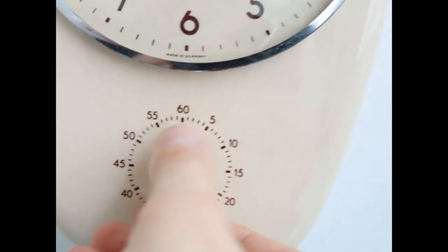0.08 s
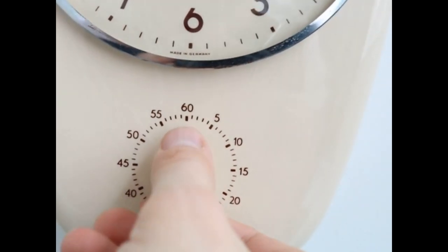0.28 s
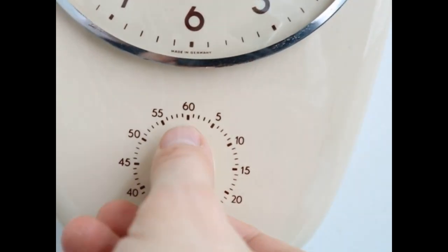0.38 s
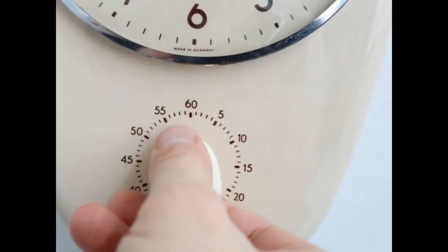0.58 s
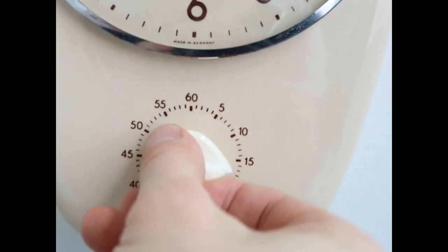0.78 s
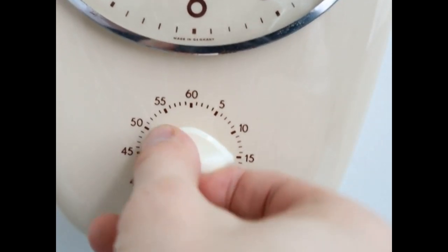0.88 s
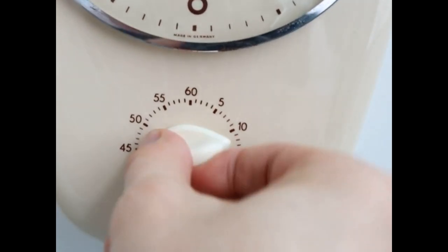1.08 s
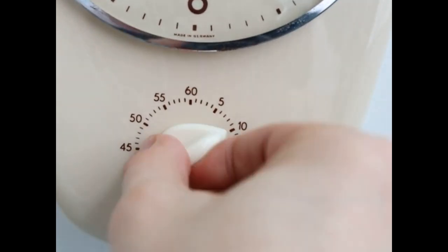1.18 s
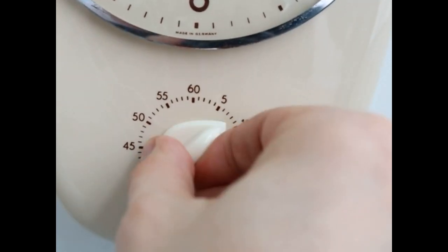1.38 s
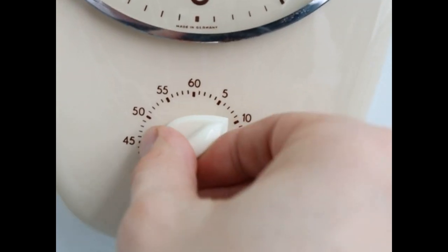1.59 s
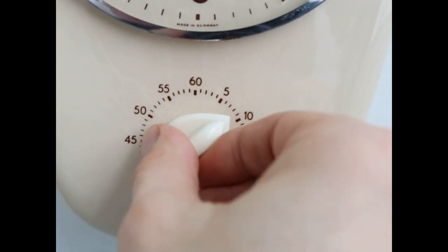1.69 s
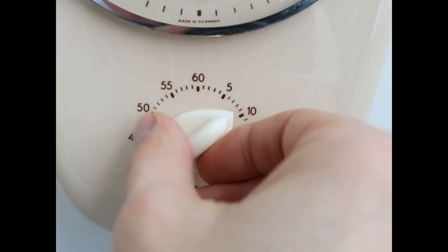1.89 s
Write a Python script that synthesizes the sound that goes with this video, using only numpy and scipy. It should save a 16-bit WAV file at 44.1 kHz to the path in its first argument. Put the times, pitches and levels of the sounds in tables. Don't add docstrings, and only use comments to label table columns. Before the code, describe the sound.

Ratcheting clicks of a hand-wound mechanical timer, with hollow finger knocks and faint clock ticking, close up

```python
import sys
import numpy as np
from scipy import signal
from scipy.fft import rfft, irfft
from scipy.io import wavfile
from scipy.ndimage import uniform_filter1d

SR = 44100
rng = np.random.default_rng(int(sys.argv[2]) if len(sys.argv) > 2 else 0)


def waveform_to_disk(signal):
    frames = np.transpose(np.atleast_2d(signal))
    scaled = np.clip(frames, -1, 1) * 32767
    samples = np.round(scaled).astype(np.int16)
    wavfile.write(sys.argv[1], SR, samples)


def field_ratio(decibels):
    return 10 ** (np.asarray(decibels, dtype=float) / 20)


N = 83790
T = np.arange(N) / SR

# [dB, hollow thump against click]
TEETH = [(0.5022, -14.5, -24), (0.5279, -17, -26), (0.5325, -17.5, -9.5), (0.6161, -16, -32),
         (0.6355, -18.5, -24), (0.642, -13.5, -27.5), (0.6657, -12, -19.5), (0.7084, -15, -22),
         (0.7384, -14, -33), (0.7574, -14, -19.5), (0.801, -13.5, -23.5), (0.8358, -19.5, -22.5),
         (0.8515, -11.5, -30), (0.8728, -13.5, -22.5), (0.8936, -12.5, -21), (0.9455, -25, -30),
         (0.9617, -13.5, -23), (0.9869, -13.5, -22.5), (1.0134, -17, -40), (1.0436, -15.5, -22.5),
         (1.0685, -15, -23), (1.0938, -15, -21), (1.1226, -15, -30), (1.1476, -13.5, -21.5),
         (1.177, -16, -43), (1.2037, -11.5, -25), (1.2282, -12.5, -22), (1.2571, -12.5, -21)]
# start_s [s], peak_db [dB]
CLOCK_TICKS = [
    (0.1131, -31),
    (0.3455, -34.5),
    (0.353, -30),
    (0.6109, -22.5),
    (.862, -20),
    (1.111, -23),
    (1.348, -25),
    (1.356, -26.5),
    (1.6155, -33.5),
    (1.8568, -33),
]
# start_s [s], peak_db [dB], contact_ms [ms]
KNOCKS = [
    (.2377, -2, 0.52),
    (.274, -17, 0.59),
    (.3495, -21, 0.73),
    (.363, -22, 1.8),
    (.386, -21.5, 1.56),
    (.394, -26.5, 0.68),
    (.5368, -12, 0.79),
    (.543, -10, 0.58),
    (.651, -17, 1.13),
]
# start_s [s], peak_db [dB], pitch_hz [Hz], second_pitch_hz [Hz]
CREAKS = [
    (.058, -34.5, 967, 1065),
    (.167, -43, 2200, 5030),
    (.2, -42, 5530, 3620),
    (.401, -48, 2200, 2460),
    (.6, -35.5, 2600, 3300),
    (1.54, -42, 2180, 1390),
    (1.777, -41, 1350, 2410),
    (1.806, -37.5, 5450, 3570),
]
# pitch_hz [Hz], level_db [dB], t60_s [s to fade by 60 dB]
PLATE = [(423, 0, 0.038), (1022, -8, 0.023), (1966, -9, 0.062), (2514, -10, 0.1), (2866, -7, 0.053),
         (3480, -9.5, 0.047), (4217, -12, 0.029), (4580, -4.5, 0.013), (5220, -15.5, 0.057),
         (5990, -13, 0.043), (6390, -16.5, 0.09), (5440, -2.5, 0.0033)]
# pitch_hz [Hz], level_db [dB], t60_s [s]
CASE = [(315.5, -13.5, 0.32), (378, -7, 0.074), (434, 5, 0.067), (572, 0, 0.034), (680, -9.5, 0.21),
        (753, -5, 0.041), (899, -3.5, 0.071), (1004, -5, 0.042), (1072, 0.5, 0.028), (1285, -15.5, 0.086)]
CASE_CUT_HZ = 245
TOOTH_DELAY_S = 0.0006


def on_hz(hz, table):
    table_hz, value = np.array(table).T
    return np.interp(np.log(np.maximum(hz, 1)), np.log(np.maximum(table_hz, 1)), value)


def unit(x):
    return x / np.sqrt(np.mean(x ** 2))


def add(out, start_s, x):
    i = int(start_s * SR)
    out[..., i:i + x.shape[-1]] += x[..., :N - i]


def smear(x, response):
    return signal.fftconvolve(np.atleast_2d(x), np.atleast_2d(response), axes=1)[:, :N]


def above(hz, x):
    return signal.lfilter(*signal.butter(2, hz, "high", fs=SR), x)


def walk(rate_hz):
    hold = int(SR / rate_hz)
    steps = np.repeat(rng.standard_normal(N // hold + 1), hold)
    return unit(uniform_filter1d(uniform_filter1d(steps, hold), hold)[:N])


def band(hz, width_octaves, side):
    f = np.arange(N // 2 + 1) * SR / N + 1
    bell = np.exp(-(np.log2(f / hz) / width_octaves) ** 2)
    mid, differ = irfft(rfft(rng.standard_normal((2, N))) * bell, N)
    return unit(np.array([mid + side * differ, mid - side * differ]))


def tilt(hz):
    port_tilt = [(60, -1), (110, 2.5), (200, -2), (380, 3), (700, -1.5), (1290, 2), (2380, -4.5),
                 (4400, -3), (8120, -6), (15000, 4.5)]
    return field_ratio(np.multiply.outer([0.5, -0.5], on_hz(hz, port_tilt)))


def ring(modes, scatter_db, swell_s=0.0001):
    left_lead = [(0, 0), (2070, -0.7), (2670, 1.3), (3010, -0.2), (4390, 0.2), (5250, -0.7), (6550, -2.0),
                 (7670, 5.0), (8790, 3.7), (9820, 5.4), (10100, 7.0), (10800, 8.5), (12000, 12.8),
                 (16400, 12.6)]
    detune = 0.004
    twins = [(f * 1.017, d - 2, t60) for f, d, t60 in modes if f > 1500]
    hz, db, t60 = np.array(modes + twins).T[:, :, None]
    pitch_chance, level_chance = rng.standard_normal((2, len(hz), 1))
    t = T[:int(SR * t60.max())]
    lead = np.multiply.outer([1, 0], np.interp(hz, *np.array(left_lead).T) * (hz > 900))
    waves = np.sin(2 * np.pi * hz * (1 + detune * pitch_chance) * t + lead)
    tones = waves * tilt(hz) * field_ratio(db + scatter_db * level_chance - 60 * t / t60)
    return tones.sum(axis=1) * (1 - np.exp(-t / swell_s))


def ratchet():
    # pitch_hz [Hz], level_db [dB], t60_s [s]
    plate_top = [(9900, -22, .055), (14000, -15, .007)]
    tooth_db, thump_boost_db, scatter_db = -12.5, 17.5, 3.5
    bounce_s, bounce_db = 0.0022, -3.5
    out = np.zeros((2, N))
    for start_s, db, thump_db in TEETH:
        modes = [(f, d + (thump_db + thump_boost_db) * (f < 600), t60) for f, d, t60 in PLATE + plate_top]
        drop_s = start_s + TOOTH_DELAY_S
        add(out, drop_s, field_ratio(db + tooth_db) * ring(modes, scatter_db))
        add(out, drop_s + bounce_s, field_ratio(db + tooth_db + bounce_db) * ring(modes, scatter_db))
    return out


def fade(x, t60_s):
    return signal.lfilter([1], [1, -field_ratio(-60 / t60_s / SR)], x)


def rattle(sharp, soft):
    rattle_level = [(410, -31), (700, -8.5), (1480, -16), (1940, -7), (4050, -5), (4730, -0.5),
                    (6570, -3.5), (10100, -13.5), (16000, -28.5)]
    rattle_t60 = [(700, .07), (2500, 0.064), (6000, 0.029), (16000, 0.007)]
    soft_swell_s, soft_longer, soft_top_hz = 0.0027, 1.18, 8100
    alike = 0.3
    out = 0
    kicks = np.zeros((2, N))
    for kick, hits in zip(kicks, (sharp, soft)):
        for start_s, db in hits:
            add(kick, start_s, field_ratio([db]))
    swell = 1 / (soft_swell_s * SR)
    pushes = signal.lfilter([swell], [1, swell - 1], kicks[1])
    for hz in 700 * 2 ** np.arange(0, 4.6, 1 / 3):
        t60 = on_hz(hz, rattle_t60)
        soft_shake = fade(pushes, t60 * soft_longer) / (1 + (hz / soft_top_hz) ** 2)
        shake = fade(kicks[0], t60) + soft_shake
        level = field_ratio(on_hz(hz, rattle_level)) * np.sqrt(hz / 8000)
        out = out + shake * band(hz, 0.22, 1 - alike) * level * tilt(hz)[:, None]
    return out


def hand():
    # pitch_hz [Hz], level_db [dB], t60_s [s]
    glaze = [(1750, -30, .06), (2100, -29, .06), (2420, -23, .07), (2750, -27, .07), (3050, -26, .07),
             (3350, -24, .07), (3650, -28, .06), (4500, -35, .08), (5500, -36, .1)]
    knock_db, dent_db, dent_s, creak_t60_s = -12, 7, 0.0009, 0.047
    thud = (650, -22, 0.005)  # Hz, dB, t60 s
    out = np.zeros((2, N))
    for start_s, db, contact_ms in KNOCKS:
        gain = field_ratio(db + knock_db)
        push = np.hanning(int(contact_ms * SR / 1000) + 2)
        add(out, start_s, gain * smear(ring(CASE + [thud], 0.66), push / push.sum()))
        add(out, start_s - dent_s / 2, -gain * field_ratio(dent_db) * np.hanning(int(dent_s * SR)))
        add(out, start_s, gain * ring(glaze, 1.8, 0.0012))
    for start_s, db, hz, second_hz in CREAKS:
        modes = [(hz, -3, creak_t60_s), (hz * 1.08, -8, creak_t60_s), (second_hz, -5, creak_t60_s)]
        add(out, start_s, field_ratio(db) * ring(modes, 0.5, 0.001))
    return above(CASE_CUT_HZ, above(CASE_CUT_HZ, out))


def rub():
    # time_s [s], level_db [dB]
    rub_level = [(0.0, -48), (0.332, -51.5), (0.48, -45.5), (0.602, -42), (0.724, -40), (1.11, -39),
                 (1.222, -44), (1.396, -44), (1.592, -62), (1.9, -58)]
    slips_per_s, slip_spread_db = 970, 3
    rub_db, hiss_db, rumble_db = -4.5, -5.5, -51.5
    grip_s, grip_width_s = 0.65, 0.36
    slips = (rng.random(N) < slips_per_s / SR) * np.sign(rng.standard_normal(N))
    slips = slips * field_ratio(slip_spread_db * rng.standard_normal(N))
    case = above(CASE_CUT_HZ, smear(slips, ring(CASE, 0)))
    voice = unit(case) + field_ratio(hiss_db) * unit(smear(slips, ring(PLATE, 0)))
    grip = np.exp(-((T - grip_s) / grip_width_s) ** 4)
    rumble = field_ratio(rumble_db + walk(5)) * np.sin(2 * np.pi * 60 * T + walk(6)) * grip
    return voice * field_ratio(np.interp(T, *np.array(rub_level).T) + rub_db) + rumble


def clock():
    # pitch_hz [Hz], level_db [dB], t60_s [s]
    clockwork = [(1000, -7, .05), (2500, -5, .05), (3230, 0, .05), (3600, -6, .04), (4800, -3, .03),
                 (5900, -8, .03), (7100, -14, .025), (9950, -19, .03)]
    tick_db = -17.5
    out = np.zeros((2, N))
    for start_s, db in CLOCK_TICKS:
        add(out, start_s, field_ratio(db + tick_db) * ring(clockwork, 1.0, 0.00066))
        add(out, start_s + 0.004, field_ratio(db + tick_db + 7.5) * ring(clockwork, 1.0, 0.00041))
    return out


def echo(near):
    room_db, t60_s, top_hz, gap_s, wide_hz = -11.5, 0.29, 5400, 0.0073, 970
    t = T[:SR // 2]
    noise = signal.lfilter(*signal.butter(1, top_hz, fs=SR), rng.standard_normal((2, len(t))))
    mid, side = noise * field_ratio(-60 * t / t60_s) * (t > gap_s)
    tail = mid + np.array([[1], [-1]]) * above(wide_hz, side)
    return field_ratio(room_db) * smear(near.mean(axis=0), unit(tail) / np.sqrt(len(t)))


def air():
    air_level = [(12, -43), (20, -26), (48, -8), (506, -13), (634, -17.5), (1080, -13.5), (2180, -18),
                 (15200, -34.5), (16500, -55)]
    # pitch_hz [Hz], level_db [dB]
    hum_tones = [(62, -62), (99, -61.5), (150, -61)]
    air_db, flicker_db = -47.5, -0.6
    noise, hum = 0, 0
    for hz in 22 * 2 ** np.arange(0, 9.7, 0.5):
        side = min(0.19 + hz / 970, 1)
        level = field_ratio(on_hz(hz, air_level) + flicker_db * walk(4)) * np.sqrt(hz)
        noise = noise + band(hz, 0.47, side) * level
    for hz, db in hum_tones:
        hum = hum + field_ratio(db + 3 + 1.2 * walk(3)) * np.sin(2 * np.pi * hz * T + 0.5 * walk(4))
    return unit(noise) * field_ratio(air_db) + hum


def scene():
    tooth_rattle_db, tick_rattle_db, knock_rattle_db, creak_rattle_db = -13.5, -3, -37, -10.5
    sharp = [(s + TOOTH_DELAY_S, db + tooth_rattle_db) for s, db, _ in TEETH]
    soft = [(s, db + creak_rattle_db) for s, db, *_ in CREAKS]
    soft += [(s, db + tick_rattle_db) for s, db in CLOCK_TICKS]
    soft += [(s, db + knock_rattle_db) for s, db, _ in KNOCKS]
    near = ratchet() + rattle(sharp, soft) + hand() + rub() + clock()
    return near + echo(near) + air()


def roll_off(x):
    return signal.sosfilt(signal.butter(12, 16820, fs=SR, output="sos"), x)


def record(dry):
    low_pass = signal.ellip(8, 0.2, 70, 16200, fs=SR, output="sos")
    return roll_off(signal.sosfilt(low_pass, dry))


dry = scene()
out = record(dry)
waveform_to_disk(out)
```